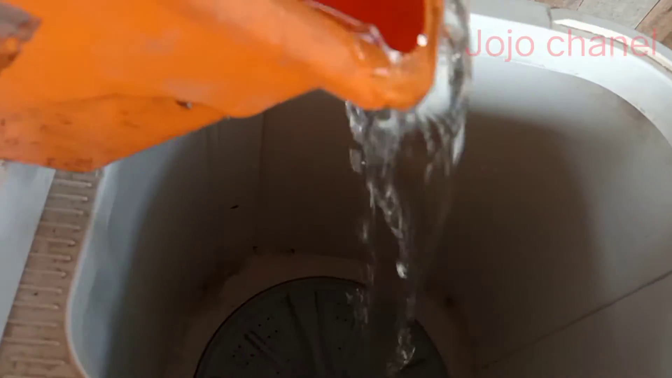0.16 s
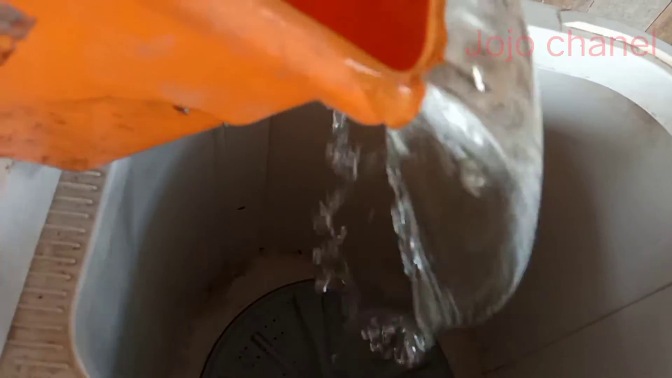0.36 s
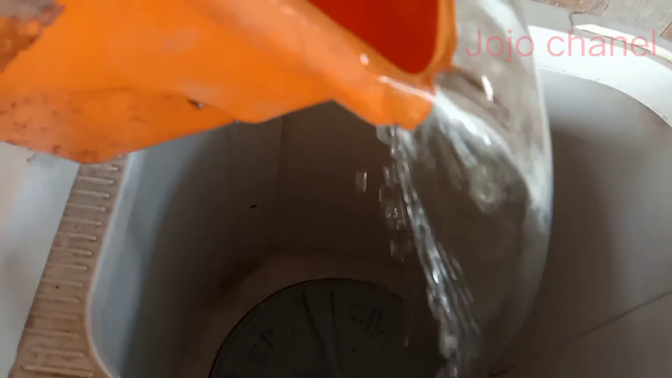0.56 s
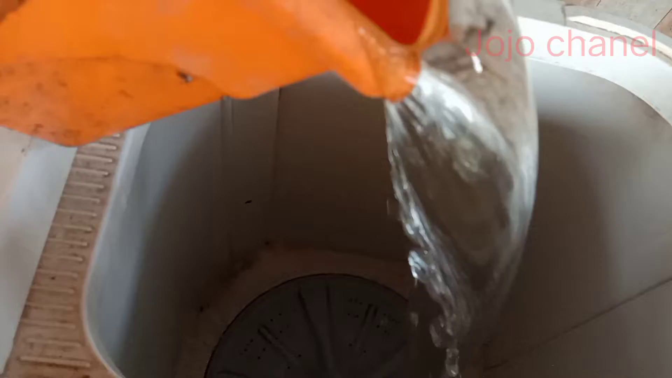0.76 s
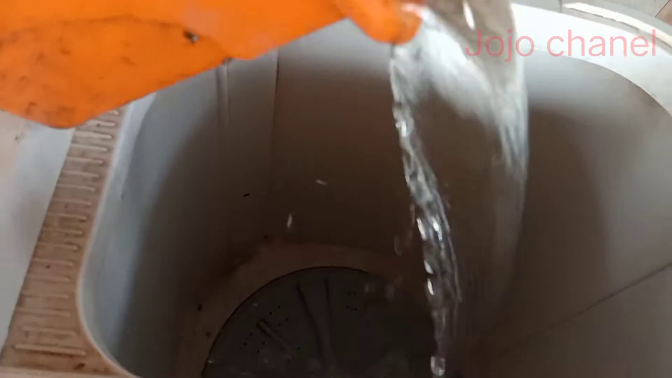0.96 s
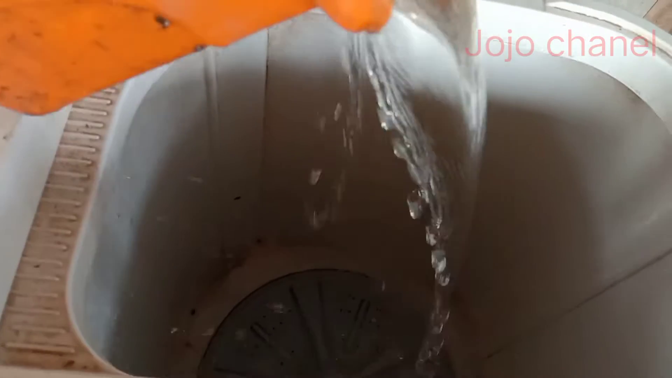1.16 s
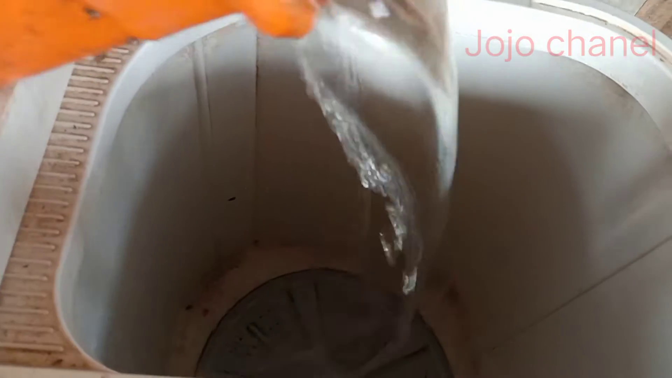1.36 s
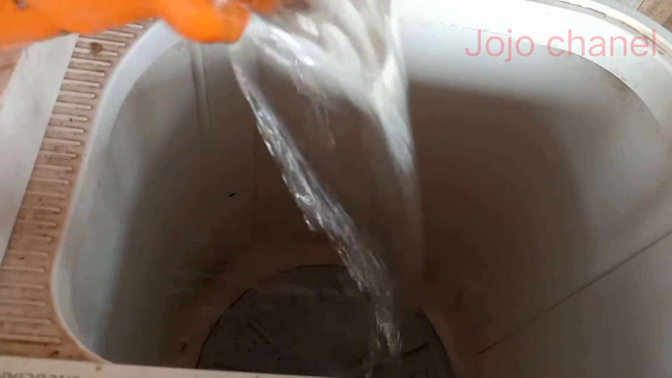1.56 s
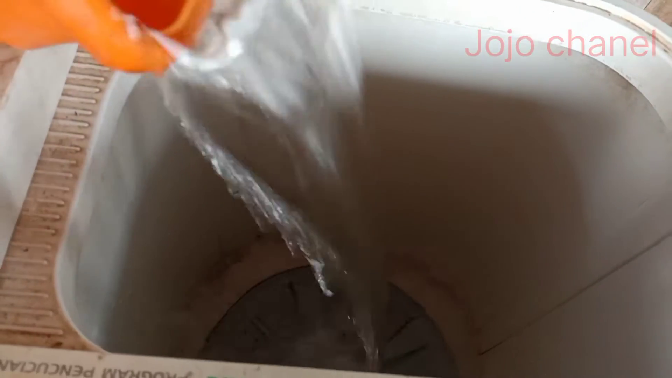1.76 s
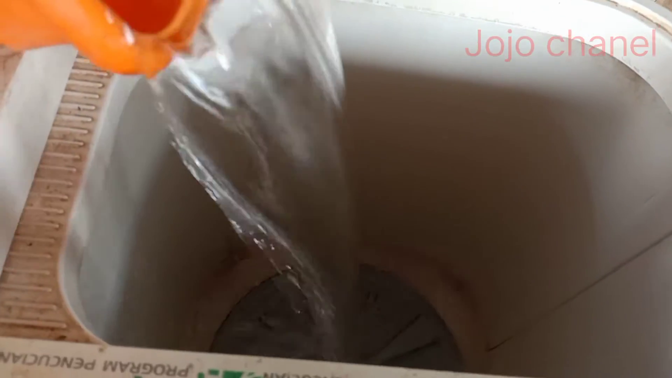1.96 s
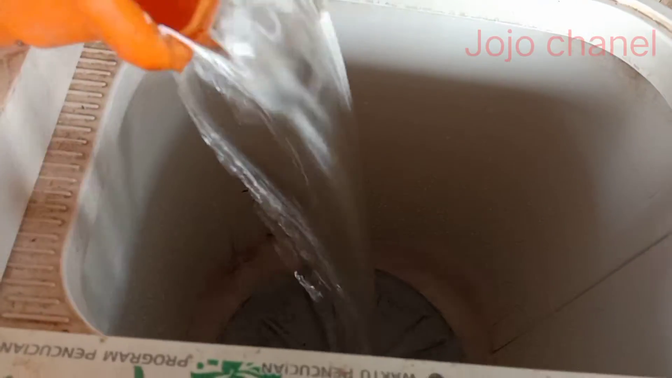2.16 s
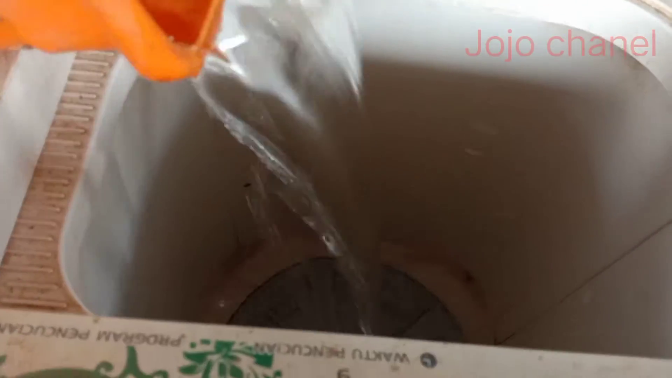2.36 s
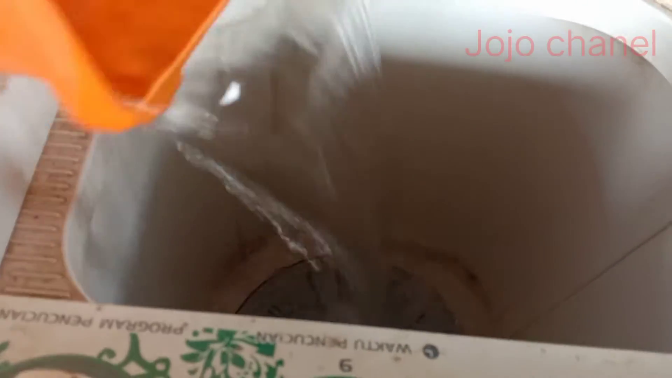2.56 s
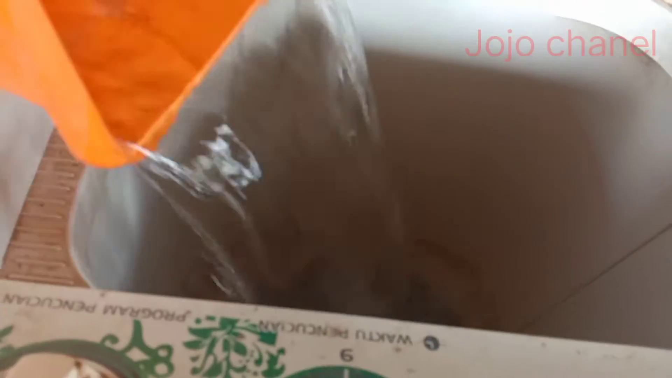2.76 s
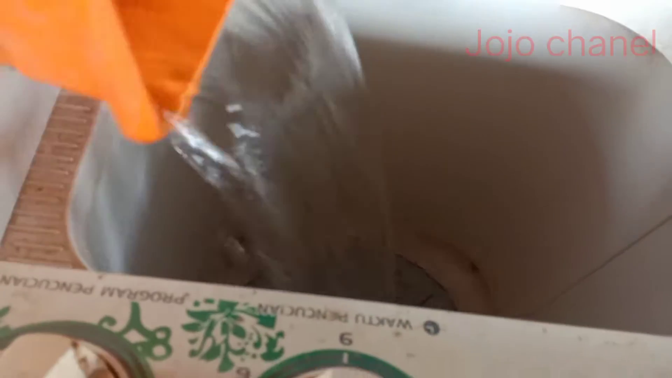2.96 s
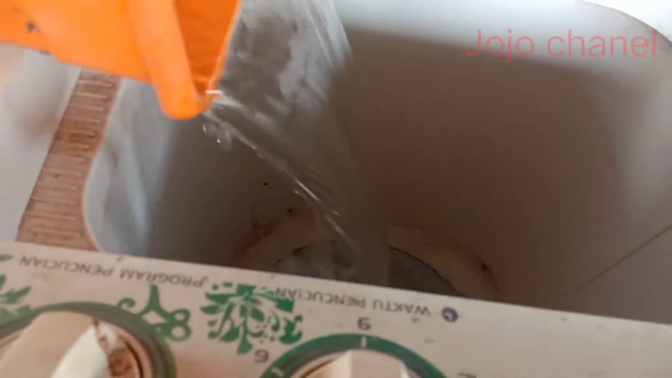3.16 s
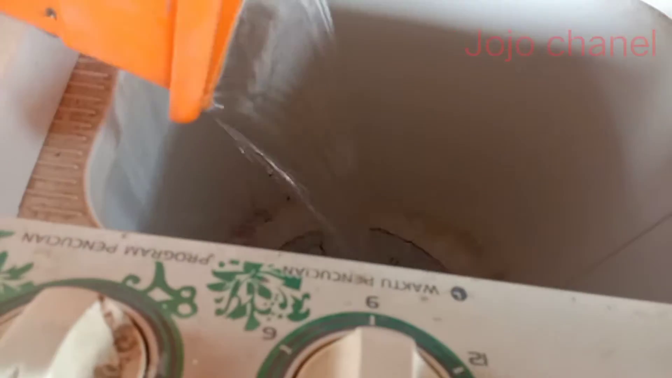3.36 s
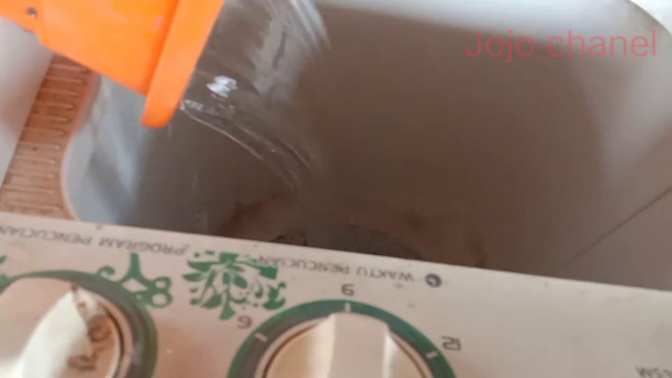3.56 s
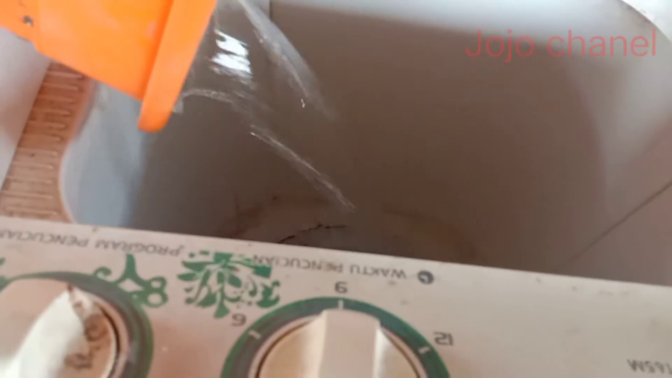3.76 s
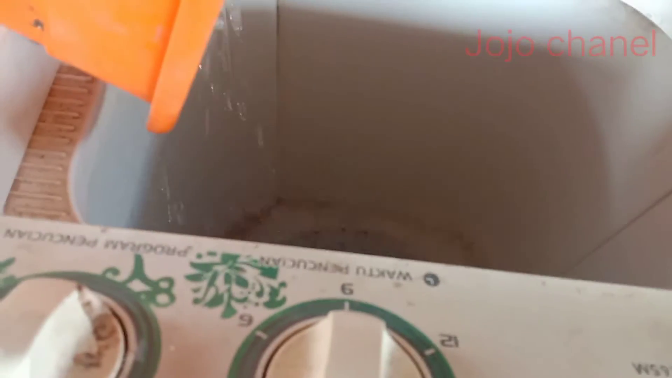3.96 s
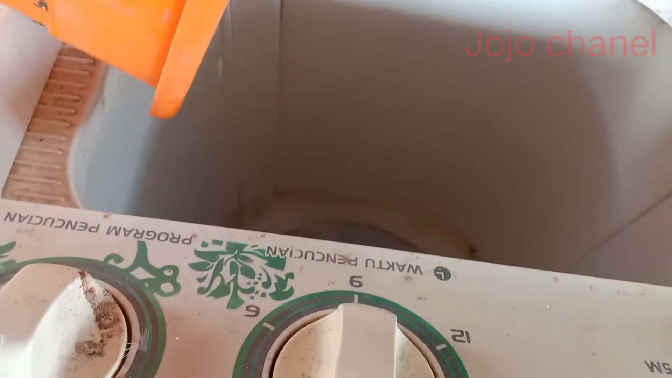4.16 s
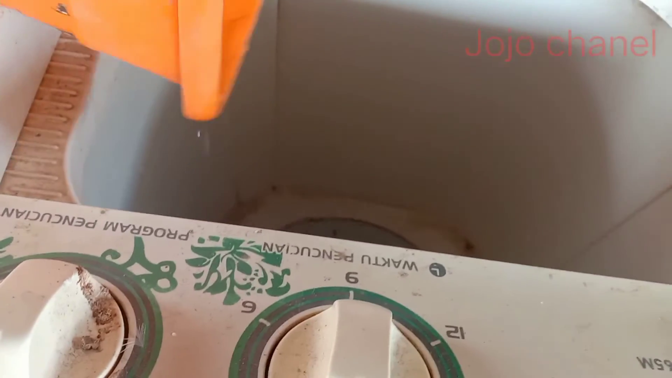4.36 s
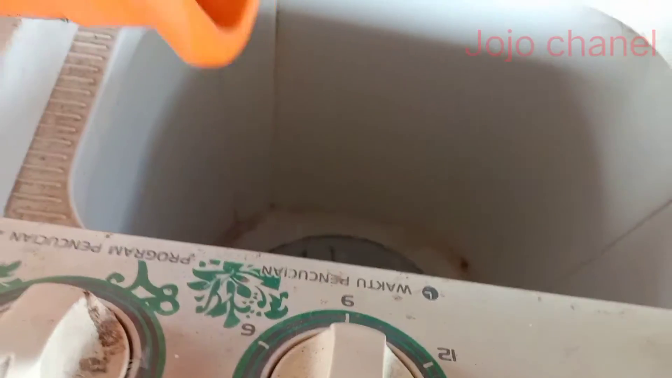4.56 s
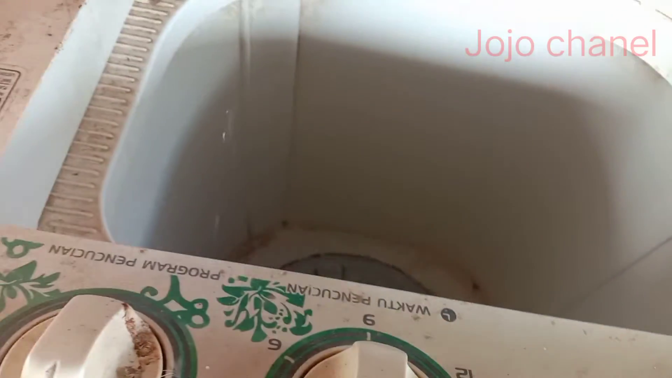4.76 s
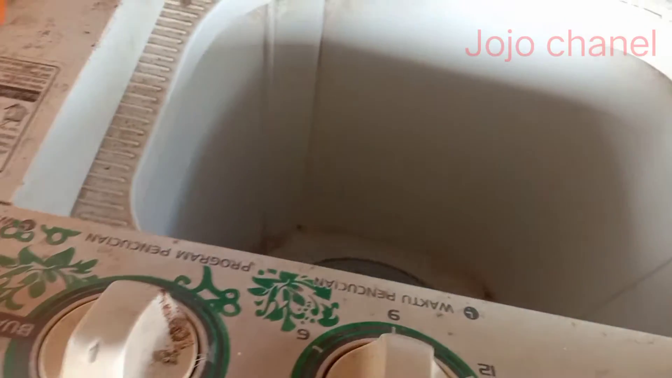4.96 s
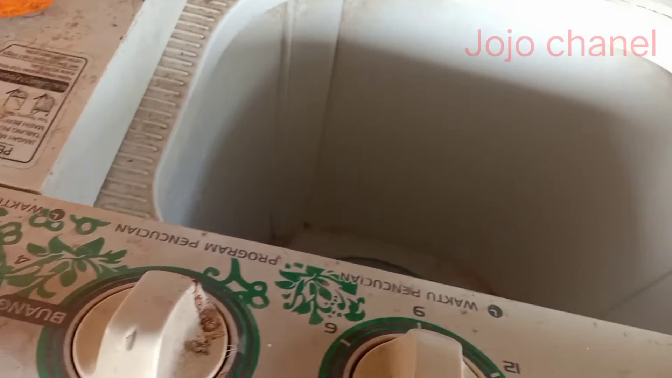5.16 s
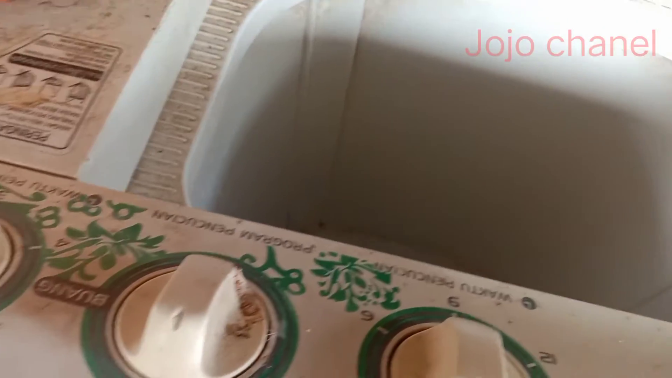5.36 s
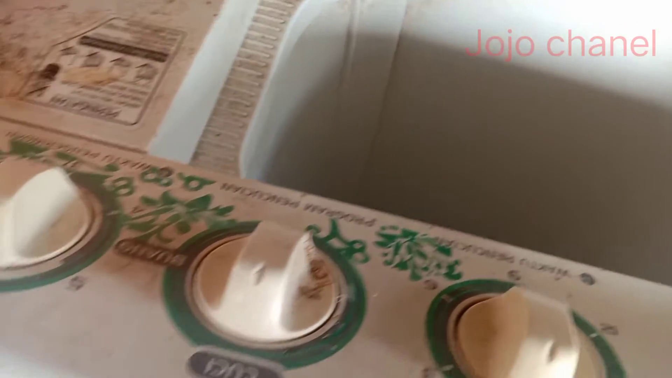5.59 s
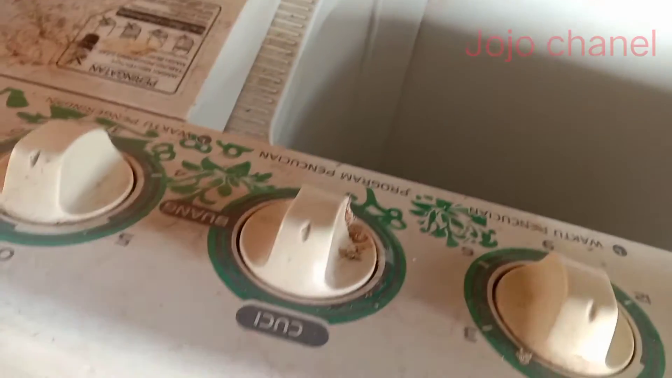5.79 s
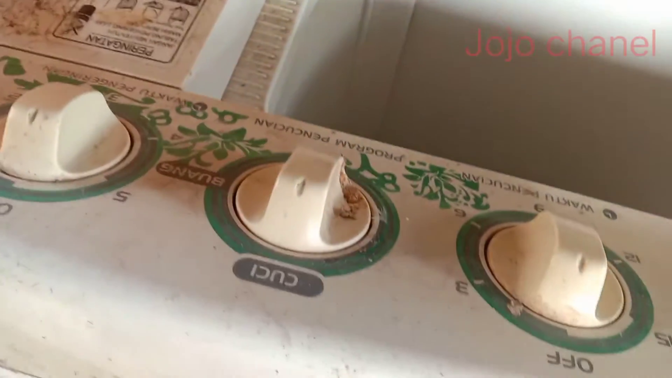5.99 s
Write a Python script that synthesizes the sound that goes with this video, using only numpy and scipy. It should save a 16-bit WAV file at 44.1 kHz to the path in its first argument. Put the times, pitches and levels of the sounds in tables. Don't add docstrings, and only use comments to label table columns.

```python
import sys
import numpy as np
from scipy import signal
from scipy.io import wavfile
from scipy.ndimage import uniform_filter1d

SR = 44100
rng = np.random.default_rng(int(sys.argv[2]) if len(sys.argv) > 2 else 0)


def wrap_up_sound(samples):
    columns = np.atleast_2d(samples).T
    tamed = np.clip(columns, -1, 1)
    steps = np.round(tamed * 32767).astype(np.int16)
    wavfile.write(sys.argv[1], SR, steps)


def to_linear_factor(level_db):
    exponent = np.asarray(level_db, float) / 20
    return 10 ** exponent


N = 265923


def evened(x):
    return x / np.sqrt(np.mean(x ** 2) + 1e-20)


def curves(rows):
    s, *columns = np.transpose(rows)
    t = np.arange(N) / SR
    on = (t >= s[0]) & (t <= s[-1] + .01)
    return [np.interp(t, s, c) for c in columns], on


def colour(x, points):
    f, db = np.transpose(points)
    hz = abs(np.fft.fftfreq(8192, 1 / SR))
    log_gain = np.interp(np.log(hz + 1), np.log(f), db, -90, -90) * np.log(10) / 20
    taps = np.fft.ifft(np.exp(np.conj(signal.hilbert(log_gain)))).real[:4096]
    return evened(signal.oaconvolve(x, taps)[:N])


def modes(x, table):
    out = 0
    for hz, width, db in table:
        pole = np.exp((2j * np.pi * hz - np.pi * width) / SR)
        out = out + to_linear_factor(db) * evened(signal.lfilter([1], np.poly([pole, pole]), x).real)
    return evened(out)


def random_sizes(per_s, spread_db, largest):
    size = to_linear_factor(spread_db * np.minimum(rng.exponential(1, N), largest))
    return size * (rng.random(N) < per_s / SR)


def landings(per_s, spread_db, t60):
    return evened(signal.lfilter([1], [1, -to_linear_factor(-60 / t60 / SR)], random_sizes(per_s, spread_db, 4)))


def grains(low_hz, high_hz, cycles, per_s, spread_db, glide, count=24):
    size = random_sizes(per_s, spread_db, 5)
    which, out = rng.integers(0, count, N), np.zeros(N)
    for k, hz in enumerate(np.geomspace(low_hz, high_hz, count)):
        u = np.arange(int(5 * cycles * SR / hz)) * hz / SR / cycles
        envelope = np.exp(-u) * (1 - np.exp(-u * 12))
        tone = np.sin(2 * np.pi * cycles * (u + glide * u ** 2)) * envelope
        out += signal.oaconvolve(size * (which == k), tone * np.sqrt(hz / cycles))[:N]
    return evened(out)


def patchy_noise(depth_db, bins, frames):
    a, b, p = rng.standard_normal((N // 64 + 9, 129, 3)).T
    p = evened(uniform_filter1d(uniform_filter1d(p, int(bins), 0), int(frames), 1))
    spectrum = (a + 1j * b) * to_linear_factor(depth_db * p)
    return evened(signal.istft(spectrum, nperseg=256, noverlap=192)[1][:N])


def hits(rows, width, rise_s, rise_per_s=0):
    out, t = np.zeros(N + SR), np.arange(SR // 4) / SR
    noise = rng.standard_normal((len(rows), len(t)))
    for (s, db, hz, t60, share), n in zip(rows, noise):
        share = np.clip(share, 0, 1)
        edges = np.minimum([hz / (1 + width), hz * (1 + width)], [SR / 3, SR / 2.1])
        band = signal.butter(2, edges, "band", fs=SR, output="sos")
        puff = evened(signal.sosfilt(band, n)) * 0.39
        tone = np.sin(2 * np.pi * hz * t * (1 + rise_per_s * t))
        envelope = to_linear_factor(db - 60 * t / t60) * (1 - np.exp(-(t / rise_s) ** 2))
        out[round(s * SR):][:len(t)] += envelope * ((1 - share) * tone + share * puff)
    return out[:N]


def alike(rows, t60, share, db=0):
    return [(s, peak + db, hz, t60, share) for s, peak, hz in rows]


def whistle(rows, width, partials):
    (hz, db), on = curves(rows)
    out = np.zeros(N)
    for k, k_db in partials:
        r = np.exp(-np.pi * k * width / SR)
        a, b = rng.standard_normal((2, on.sum()))
        flutter = signal.lfilter([1], np.poly([r, r]), a + 1j * b)
        carrier = np.exp(2j * np.pi * k * np.cumsum(hz[on]) / SR)
        out[on] += to_linear_factor(k_db) * evened((flutter * carrier).real)
    return to_linear_factor(db) * out


def tub_echo(x, t60, wet_db):
    at = np.arange(60, SR // 4, 22)
    at = at + rng.integers(0, 22, len(at))
    taps = np.zeros(SR // 4 + 22)
    taps[at] = rng.choice([-1., 1.], len(at)) * to_linear_factor(-60 * at / SR / t60)
    return x + to_linear_factor(wet_db) * signal.oaconvolve(x, taps / np.linalg.norm(taps))[:N]


# pitch_hz, level_db
RUMBLE = [(12, -64.5), (20, -39), (32, -22.5), (70, 0.5), (100, -7.5), (130, -21), (220, -120)]
ROOM = [(24, -39), (40, -9), (207, 1), (535, -10), (740, -22), (1280, -11), (1410, -15), (2270, -24),
        (3060, -16), (4350, -31), (5580, -28), (8110, -37), (15500, -40)]


def room():
    hum = to_linear_factor(-73.5) * colour(rng.standard_normal(N), RUMBLE)
    return hum + to_linear_factor(-70) * colour(patchy_noise(2.3, 4.5, 27), ROOM)


# start_s, trickle_db
DRAIN = [
    (4.2, -67),
    (4.28, -61.5),
    (4.42, -65),
    (4.55, -70),
    (4.98, -72.5),
    (5.2, -75),
    (5.35, -84),
    (5.6, -82.5),
    (5.95, -93),
]
# pitch_hz, level_db
TRICKLE = [(200, -36), (300, -6), (900, -7), (1270, -6.5), (1700, -10), (3200, -10.5), (4500, -15),
           (7300, -16.5), (8100, -32), (10000, -23), (13500, -36), (15000, -20), (15600, -24.5)]


def drain():
    (trickle_db,), on = curves(DRAIN)
    trickle = to_linear_factor(trickle_db + 9.5) * colour(patchy_noise(2.2, 9, 25), TRICKLE)
    bubbles = grains(610, 3050, cycles=13, per_s=45, spread_db=1, glide=0.0084, count=8)
    return on * (trickle + to_linear_factor(trickle_db - 6) * bubbles)


# start_s, pitch_hz, level_db
SQUEAK = [
    (4.99, 3080, -57),
    (5.03, 3210, -61),
    (5.11, 3100, -52),
    (5.175, 3100, -67),
    (5.28, 3120, -58),
    (5.32, 3050, -69),
    (5.37, 3250, -71),
    (5.51, 3050, -57.5),
    (5.6, 3120, -74),
]
# start_s, pitch_hz, level_db
GROAN = [
    (5.38, 1334, -72),
    (5.43, 1340, -65),
    (5.465, 1323, -74),
    (5.485, 1330, -58),
    (5.57, 1255, -52),
    (5.61, 1260, -61),
    (5.65, 1240, -84),
]
# multiple, level_db
GROAN_PARTIALS = [(1, -0.5), (2, -17), (3.08, -22)]
# start_s, pitch_hz, level_db
SCRAPE = [
    (5.77, 4020, -92),
    (5.8, 4150, -80),
    (5.83, 4000, -82),
    (5.845, 3500, -76),
    (5.87, 3400, -79.5),
    (5.89, 3210, -87.5),
]
# start_s, pitch_hz, level_db
WHINES = [
    [(5.31, 14400, -95), (5.33, 14480, -86), (5.365, 14680, -86), (5.385, 14200, -89), (5.455, 14000, -86),
     (5.49, 12950, -88), (5.515, 12900, -95)],
    [(5.505, 14200, -95), (5.53, 13600, -90), (5.56, 14050, -89), (5.59, 13850, -90), (5.63, 12830, -96)],
]
# start_s, pitch_hz, level_db
LOW_WHINE = [
    (5.55, 11300, -96),
    (5.59, 12100, -90),
    (5.68, 9700, -96),
]


def rim_rub():
    rub = whistle(SQUEAK, 170, [(0.98, -2.0)]) + whistle(GROAN, 115, GROAN_PARTIALS)
    rub += whistle(SCRAPE, 520, [(1, 0)])
    for rows in [*WHINES, LOW_WHINE]:
        rub += whistle(rows, 60, [(1, 0)])
    return rub


# start_s, peak_db, pitch_hz, t60_s, noise_share
KNOCKS = [(4.184, -25, 1270, 0.069, 0.8), (4.325, -35.5, 854, 0.15, 0.4), (4.44, -28.5, 738, 0.073, 0),
          (4.474, -26, 670, 0.048, 0.14), (4.493, -25.5, 520, 0.05, 0.28), (4.633, -32.5, 1700, 0.035, 0.7),
          (4.744, -48, 1580, 0.075, 0.3), (4.835, -47, 272, 0.15, 0.6), (4.892, -43, 256, 0.11, 0.63),
          (4.958, -17, 425, 0.057, 0.37), (4.999, -24.5, 410, 0.043, 0.85), (5.174, -40, 369, 0.094, 0.4),
          (5.738, -22, 358, 0.043, 1), (5.752, -36, 360, 0.091, 0.8), (5.765, -37.5, 256, 0.07, 0.44)]
# start_s, peak_db, pitch_hz, t60_s, noise_share
PINGS = [(4.2244, -39, 1470, 0.08, 0.5), (4.2494, -26.5, 1394, 0.055, 0.5), (4.3344, -40, 2475, 0.093, 0.5),
         (4.353, -37, 3340, 0.068, 0.4), (4.4398, -26.5, 1104, 0.083, 0.65),
         (4.464, -29.5, 1160, 0.13, 0.9), (4.8356, -40, 1240, 0.028, 0.25), (4.8923, -50, 1330, 0.13, 0.55),
         (4.958, -40, 1290, 0.14, 0.4), (4.888, -47, 1960, 0.066, .6), (4.945, -43, 2200, .06, .7),
         (5.05, -48, 1320, 0.76, 0.73), (4.998, -30, 1846, 0.048, 0.64), (5.7316, -37.5, 1276, 0.05, 0.5),
         (5.7673, -53, 962, 0.056, 0.6), (5.8237, -53, 960, 0.19, 0.96), (5.848, -53, 1140, 0.088, 0.88)]
# start_s, peak_db, pitch_hz, t60_s, noise_share
THUDS = [
    (4.322, -43, 164, 0.16, 0),
    (4.58, -36.5, 137, 0.031, 0.15),
    (4.74, -47, 135, 0.22, 0.4),
    (4.968, -36.5, 254, 0.088, 0.24),
    (5.753, -30.5, 157, 0.11, 0.3),
    (5.828, -44.5, 136.6, 0.16, 0.1),
    (5.76, -35.5, 87.6, 0.34, 0.16),
]


def knocks():
    body = hits(KNOCKS, width=.35, rise_s=.002) + hits(PINGS, width=.18, rise_s=.002)
    return body + hits(THUDS, width=0.38, rise_s=0.00062)


# start_s, peak_db, pitch_hz
DRIPS = [(4.2844, -35, 9570), (4.339, -28, 5870), (4.3944, -37.5, 7300), (4.5775, -49, 4500),
         (4.5285, -54, 10900), (4.8653, -54, 9600), (4.9501, -64, 10000), (5.1516, -64, 9900),
         (5.222, -63, 5840), (5.43, -66, 4600), (4.6438, -43, 9400), (4.7994, -54, 4680),
         (5.1098, -57, 5800), (5.2864, -58, 8830), (5.9304, -60.5, 7700), (5.937, -55, 7330),
         (6.021, -54, 7550)]
# start_s, peak_db, pitch_hz
MIST = [(4.337, -42, 14900), (4.3949, -47, 14900), (4.6453, -46, 14900), (4.937, -58, 7250),
        (4.965, -50, 7250), (4.5764, -59, 14800), (4.7391, -61, 14800), (4.8029, -56, 15000),
        (4.9201, -62, 14500), (4.965, -60, 14700), (4.9965, -65, 15000), (5.4195, -63, 14700)]


def drips():
    bursts = hits(alike(DRIPS, 0.039, 0.81), width=0.17, rise_s=0.0026)
    return bursts + hits(alike(MIST, .09, .95), width=0.04, rise_s=.002)


# start_s, peak_db, pitch_hz, t60_s, noise_share
GLUGS = [
    (.152, -32.5, 845, 0.19, 0.1),
    (0.22, -29.5, 840, 0.15, 0),
    (1.857, -12, 1250, 0.076, 0.1),
    (1.878, -14, 1225, 0.063, 0),
    (2.9, -20, 2000, 0.045, 0.5),
    (2.82, -19.5, 2000, 0.075, 0.4),
    (2.875, -16.5, 1510, 0.1, 0.3),
    (1.071, -14.5, 2200, 0.04, 0.7),
    (4.47, -32, 349, 0.13, 0.3),
]
# start_s, peak_db, pitch_hz
PLOPS = [(0.702, -17, 734), (0.758, -15, 682), (1.072, -14.5, 1375), (1.129, -11, 1574),
         (1.245, -12.5, 1415), (1.379, -13.5, 513), (1.763, -13, 1394), (3.669, -21, 1680),
         (4.047, -22, 776), (0.287, -25.5, 826), (0.398, -33.5, 860), (1.195, -23, 540),
         (1.292, -21.5, 896), (1.856, -12.5, 462), (3.066, -18.5, 876), (3.122, -19, 748),
         (3.228, -20.5, 789), (3.85, -24, 747), (4.105, -24, 780), (4.158, -30, 877)]
# start_s, peak_db, pitch_hz
BEADS = [(4.171, -20, 2580), (4.185, -21, 3500), (4.19, -33, 5450), (4.21, -36, 4060), (4.221, -35, 3700),
         (4.229, -37, 2450), (4.232, -40, 6840), (4.241, -39, 2450), (4.25, -39, 5300), (4.258, -34, 1350),
         (4.266, -37, 4640), (4.352, -37, 7200), (4.392, -46, 1780), (4.394, -45, 3900), (4.49, -46, 4370),
         (4.577, -48, 2980), (4.584, -48, 1510), (4.637, -50, 2370), (4.836, -48, 755), (4.898, -50, 780),
         (4.907, -55, 2950), (4.915, -57, 3750), (5.035, -48, 3600), (5.53, -57, 2600), (5.768, -50, 1290)]


def bubbles_bursting():
    air = hits(GLUGS, width=.18, rise_s=.002)
    air += hits(alike(PLOPS, 0.077, 0.66), width=0.76, rise_s=0.0039)
    air += hits(alike(BEADS, 0.076, 0.65), width=.1, rise_s=0.0016)
    riser = [(5.084, -22, 740, .07, .4)]  # start_s, peak_db, pitch_hz, t60_s, noise_share
    return air + hits(riser, width=.3, rise_s=0.018, rise_per_s=14)


# start_s, peak_db, pitch_hz
POCKETS = [
    (2.975, -20.5, 1445),
    (3.015, -18.5, 1467),
    (3.175, -20, 1510),
    (3.28, -22, 1480),
    (3.52, -19.5, 1364),
    (4.355, -41, 2550),
    (4.21, -33, 1450),
    (5.19, -40.5, 448),
]


def pockets():
    return hits(alike(POCKETS, 0.16, 0.57), width=.08, rise_s=.005)


# pitch_hz, width_hz, level_db
SHELL = [(115.5, 5.7, 1.5), (136.6, 31, 14.5)]
SHELL_UPPER = [(167, 14, 0), (202.2, 39, -1), (263, 29, -5)]
RING = [(1255, 28, -2), (1234, 170, 5.5)]
# pitch_hz, level_db
GURGLE = [(160, -31.5), (280, -19), (322, -13), (573, -12), (1060, -8), (1260, 0.5), (1500, -11),
          (1950, -26.5), (3300, -120)]


def shell(lumps, flow_db, weight_db, aim, depth):
    (trickle_db,), settling = curves(DRAIN)
    force = to_linear_factor(flow_db + weight_db - 2.5 - 10.5 * depth)
    force = force + settling * to_linear_factor(trickle_db + 10.5)
    white = rng.standard_normal((5, N))
    plops = grains(299.9, 1050.4, cycles=10.4, per_s=260, spread_db=2.5, glide=0.0018)
    gurgle = colour(white[0] * (1 + 0.69 * lumps) + .5 * plops, GURGLE)
    blows = white[1] * (1 + 0.68 * lumps)
    upper = to_linear_factor(-7 + 14.5 * aim) * modes(blows, SHELL_UPPER)
    boom = modes(blows, SHELL) + upper + to_linear_factor(-33) * colour(white[2], RUMBLE)
    ring = modes(white[3] * (1 + 0.1 * lumps), RING)
    swell = evened(uniform_filter1d(uniform_filter1d(white[4], size=2000), size=2000))
    ring_db = -18 + 6 * depth + 3 * swell
    poured = to_linear_factor(flow_db) * (to_linear_factor(-10 + 0.5 * depth) * gurgle + to_linear_factor(ring_db) * ring)
    return force * boom + settling * to_linear_factor(trickle_db + 3.0) * ring + poured


# start_s, peak_db, pitch_hz
BLOWS = [(0.064, -19.5, 137), (0.201, -22, 137.4), (0.314, -19, 139.7), (0.552, -14, 144),
         (0.644, -25, 140), (0.89, -22.5, 126), (1.085, -14.5, 142.4), (1.272, -21, 133),
         (1.378, -14.5, 123), (1.467, -22, 210), (1.569, -11, 192), (1.654, -18, 204), (1.719, -24, 186),
         (1.871, -20, 197), (1.958, -26, 108), (2.269, -22.5, 154), (2.401, -28.5, 137),
         (2.507, -18.5, 158), (2.655, -22, 196), (2.982, -21.5, 172), (3.451, -23.5, 135),
         (4.039, -23, 161)]
# start_s, peak_db
CHIMES = [(2.21, -18.5), (0.505, -18), (1.3545, -20.5), (1.492, -19), (1.526, -19.5), (1.5896, -20.5),
          (1.703, -23.5), (1.7681, -14.5), (1.9155, -20.5), (2.0276, -14), (2.1205, -25), (2.4328, -18),
          (2.695, -12), (2.79, -15), (2.8961, -19), (3.0602, -20.5), (3.56, -21), (3.8275, -23),
          (3.989, -22), (4.09, -22)]


def drums():
    booms = hits(alike(BLOWS, 0.21, 0.41, -0.5), width=0.15, rise_s=0.0096)
    chimes = [(s, db - 4, RING[0][0], 0.24, .42) for s, db in CHIMES]
    return booms + hits(chimes, width=0.05, rise_s=0.01)


# start_s, peak_db, pitch_hz
FLECKS = [(0.0154, -19, 10500), (0.1905, -14, 9800), (0.2638, -24, 14700), (0.2877, -14, 10500),
          (0.5262, -15, 14000), (0.5851, -18.5, 14600), (0.8629, -21, 14700), (1.3887, -16, 14000),
          (1.4072, -18.5, 14600), (1.6551, -17.5, 14700), (1.8756, -22.5, 14800), (1.9505, -21.5, 14900),
          (2.3421, -21.5, 10100), (2.5721, -25, 13000), (2.6564, -12.5, 8720), (2.9836, -18, 14000),
          (4.1011, -25, 14900)]


def flecks():
    return hits(alike(FLECKS, 0.01, 1.0), width=0.17, rise_s=0.00043)


# start_s, peak_db, pitch_hz
CRACKS = [(0.0174, -6, 6900), (0.192, -6.5, 5900), (0.4984, -9, 5130), (0.6499, -2, 4130),
          (0.668, -4, 2920), (1.1276, -10.5, 2800), (1.133, -9, 3280), (1.4942, 2, 2600),
          (1.7657, -1, 4500), (1.7739, -2, 5500), (1.857, 3, 5500), (2.5395, -5.5, 3730),
          (0.2262, -13.5, 3600), (1.3405, -7, 4800), (1.4262, -11.5, 3470), (2.573, -5.5, 6450),
          (2.984, -4.5, 6500), (3.974, -14.5, 4000), (4.0405, -13, 5000), (4.058, -13, 6500),
          (4.094, -12, 4500), (4.146, -4, 5170), (4.4388, -32, 2820), (5.7314, -46, 2590),
          (5.7322, -51.5, 5200), (5.768, -56, 1990), (4.9985, -42, 5200)]


def cracks():
    return hits(alike(CRACKS, 0.0027, 0.42), width=0.65, rise_s=0.000058)


# start_s, peak_db, pitch_hz
SLAPS = [(0.015, -12, 7000), (0.189, -10, 5600), (0.225, -15, 3000), (0.497, -8, 5250), (0.534, -12, 5700),
         (0.5855, -10, 5340), (0.629, -12.5, 2860), (0.6489, -7, 3900), (0.6668, -11, 2770),
         (0.6867, -11, 5900), (0.7188, -9, 6100), (0.771, -9, 2750), (1.072, -14, 2290),
         (1.1284, -6.5, 2160), (1.1962, -10.5, 2100), (2.643, -13, 4550), (1.391, -8, 6700),
         (1.41, -9, 2750), (1.495, -10, 2220), (1.7692, -9.5, 2516), (1.832, -9.5, 5660),
         (1.8552, -11.5, 4840), (2.0654, -12, 3890), (2.392, -12, 5450), (2.538, -12, 3440),
         (2.821, -18, 2030), (2.9816, -16.5, 5800), (3.9715, -10, 3420), (4.0913, -13, 2370),
         (4.146, -15, 5040), (0.0523, -14.5, 4390), (0.266, -14, 5680), (0.552, -16.5, 6200),
         (0.724, -18, 4500), (1.0286, -11, 5710), (1.244, -12.5, 2600), (1.3394, -13.5, 4800),
         (1.375, -13.5, 3300), (1.545, -11, 2100), (2.4947, -21, 3350), (2.571, -18, 6000),
         (3.155, -12, 2690), (3.453, -12.5, 2690), (3.5538, -15, 2290), (3.8307, -14, 3670),
         (3.845, -24, 2900), (4.04, -19, 6000), (4.056, -15, 7000), (4.067, -18, 4300)]


def slaps():
    return hits(alike(SLAPS, 0.035, 0.74), width=0.2, rise_s=.0009)


# start_s, flow_db, weight_db on the bare shell, aim (0 middle - 1 wall)
STREAM = [(0.0, -29, 15, 0.56), (.025, -31, -8.5, 0.7), (.11, -38, 0, 0.29), (.21, -29.5, 0.5, 0.32),
          (.63, -25, -2, 0.19), (.74, -30.5, 3.5, 0.18), (.81, -26.5, -1.5, 0.36), (1.41, -27, 1.5, 0.33),
          (1.56, -25, -6.5, 0.93), (1.87, -23.5, -3, 0.45), (2.29, -29, -4.5, 0.36),
          (2.45, -29.5, -0.5, 0.43), (2.57, -27.5, -5.5, 0.43), (3.69, -29, -1, 0.31),
          (3.8, -33, -3.5, 0.95), (3.86, -29, -3.5, 0.23), (4.195, -34, 2.5, 0.19),
          (4.26, -57.5, -12, 0.091)]
# start_s, change_db, length_s
GUSHES = [(0.306, 3, 0.035), (0.467, -3, 0.1), (0.164, -5, 0.029), (0.61, -2, 0.054), (0.768, 4, 0.039),
          (1.077, 0.7, 0.055), (1.103, -3, 0.026), (1.13, 2.5, 0.022), (1.25, 1.5, 0.032), (1.4, 2, 0.074),
          (1.427, 2.5, 0.014), (1.498, 1.5, 0.021), (1.663, -2.5, 0.068), (1.748, -5.5, 0.052),
          (1.769, 5, 0.026), (1.822, -2, 0.081), (1.848, 2.5, 0.043), (1.888, -3.5, 0.089),
          (1.964, 1, 0.026), (1.999, -3, 0.036), (2.17, 2.5, 0.026), (2.472, -2.5, 0.066),
          (3.165, 2.5, 0.038), (3.578, 1.6, 0.058), (3.845, 0.5, 0.047), (3.91, -3, 0.065),
          (3.972, 2.5, 0.048), (4.018, -3, 0.054), (4.063, 1, 0.11)]


def flow():
    (flow_db, weight_db, aim), on = curves(STREAM)
    t = np.arange(N) / SR
    neck_s, neck_db, surge_db, surge_t60 = 0.015, -2.5, 2, 0.031
    for s, db, hz in SLAPS:
        size = to_linear_factor(db + 8.5)
        at = round(s * SR)
        flow_db[max(at - round(neck_s * SR), 0):at] += size * neck_db
        flow_db[at:at + SR // 4] += size * surge_db * to_linear_factor(-60 * t[:SR // 4] / surge_t60)
    for s, db, length in GUSHES:
        near = slice(round((s - length) * SR), round((s + length) * SR))
        flow_db[near] += db * np.cos(np.pi / 2 * (t[near] - s) / length) ** 2
    pour_s = 4.2
    return np.where(on, flow_db, -140), weight_db, aim, np.minimum(t / pour_s, 1)


# pitch_hz, level_db
SPRAY = [(1530, -24.5), (2600, -10.5), (3450, 1.5), (4350, -0.5), (5570, 2), (6180, -2), (6820, 2.5),
         (7450, -2), (8150, -13), (9330, -7), (13400, -14.5), (14800, -5.5), (15500, -3)]
SPLASH = [(790, -26), (1350, -8), (1670, -11.5), (2180, -10), (3000, -10.5), (3900, -18.5), (6600, -120)]


def pour(lumps, flow_db, depth):
    ragged = 0.26 * depth ** 8
    drops = patchy_noise(1.36, 6.1, 14) * (1 + (0.2 + ragged) * lumps) / (1 + ragged)
    drops = drops + .45 * grains(1400, 9000, cycles=2.5, per_s=2200, spread_db=3.6, glide=.03)
    bubbles = grains(1400, 3200, cycles=23, per_s=71, spread_db=-2.0, glide=0.013)
    splash = colour(drops, SPLASH) + to_linear_factor(-13) * bubbles
    spray = to_linear_factor(-0.5) * colour(drops, SPRAY)
    return to_linear_factor(flow_db) * (spray + to_linear_factor(-12 + 10 * depth) * splash)


def scene():
    lumps = landings(per_s=98, spread_db=4.0, t60=0.054)
    flow_db, weight_db, aim, depth = flow()
    sharp = drips() + flecks() + slaps()
    dull = knocks() + bubbles_bursting()
    echoing = tub_echo(sharp, t60=0.16, wet_db=-3.5) + tub_echo(dull, t60=0.1, wet_db=-6)
    water = drain() + pockets() + cracks() + pour(lumps, flow_db, depth)
    plastic = shell(lumps, flow_db, weight_db, aim, depth) + drums()
    return (room() + rim_rub() + echoing + plastic + water)[None]


def band_limit(x):
    return signal.sosfilt(signal.butter(12, 16830, fs=SR, output="sos"), x)


def record(dry):
    x = signal.sosfilt(signal.butter(2, 70, "high", fs=SR, output="sos"), dry)
    top_cut = signal.firwin(1023, 15650, window=("kaiser", 10), fs=SR)
    x = signal.oaconvolve(x, top_cut[None], "same")
    return band_limit(x)


dry = scene()
out = record(dry)
wrap_up_sound(out)
```